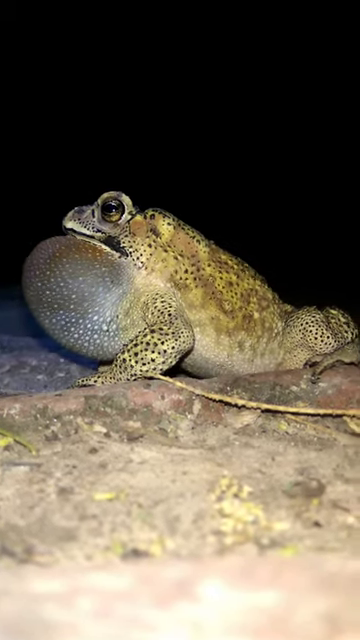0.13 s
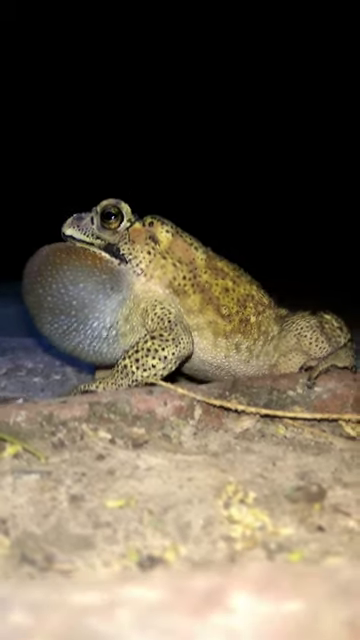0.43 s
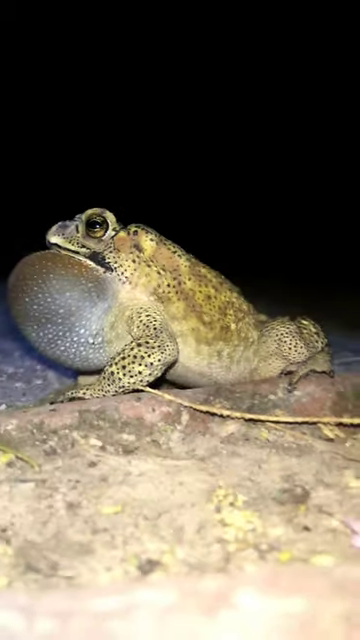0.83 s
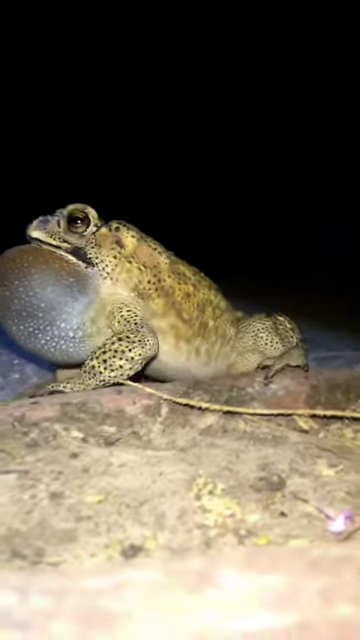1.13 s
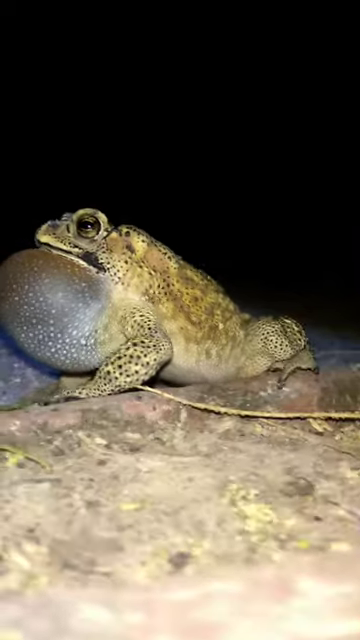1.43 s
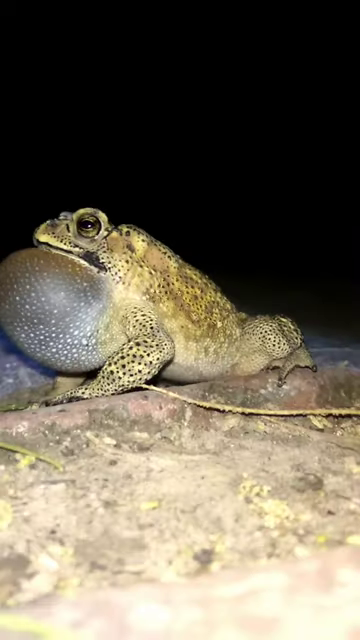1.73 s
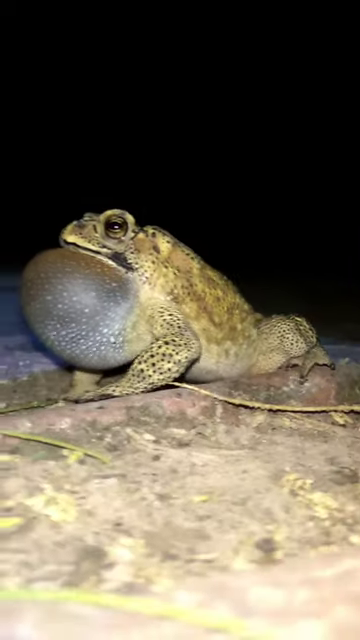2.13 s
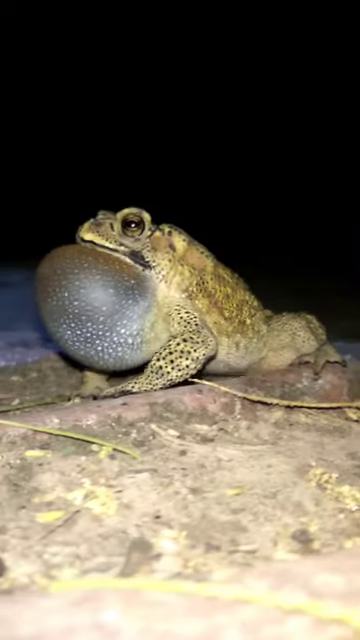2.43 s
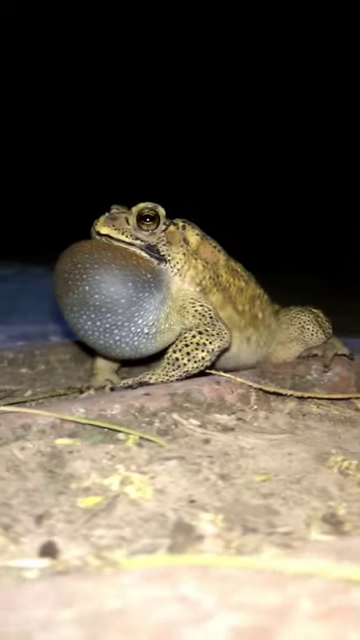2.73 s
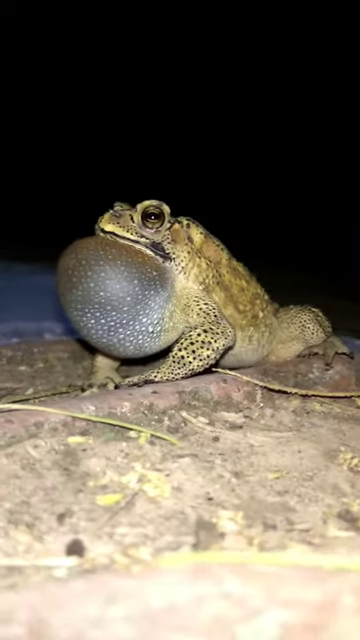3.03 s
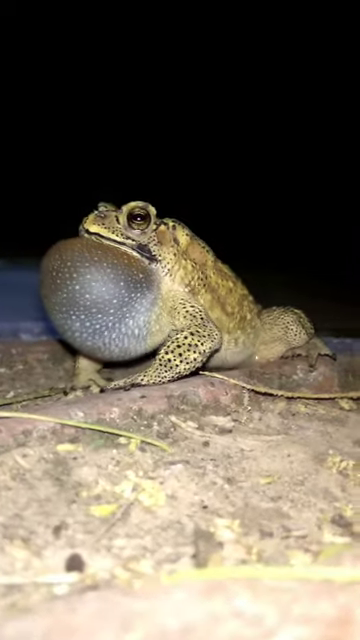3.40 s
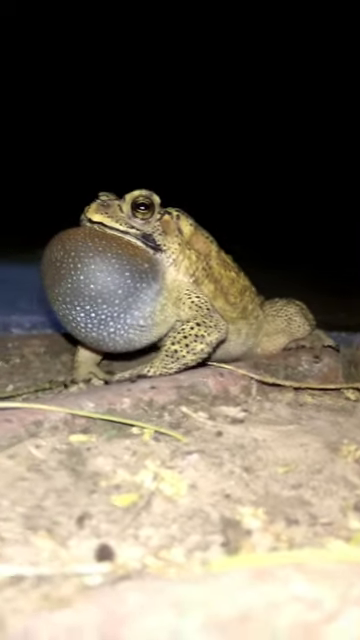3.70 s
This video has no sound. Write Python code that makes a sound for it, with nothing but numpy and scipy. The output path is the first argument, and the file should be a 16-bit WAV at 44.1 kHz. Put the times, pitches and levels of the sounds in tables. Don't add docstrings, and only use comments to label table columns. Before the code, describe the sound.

A toad close by trills steadily, loud pulsed tonal notes repeating about nine times a second at night.

```python
import sys
import numpy as np
from scipy import signal
from scipy.fft import rfft, irfft
from scipy.io import wavfile
from scipy.ndimage import uniform_filter1d

SR = 44100
rng = np.random.default_rng(int(sys.argv[2]) if len(sys.argv) > 2 else 0)


def magnitude_from_level(level_db):
    exponent = np.asarray(level_db, float) / 20
    return 10 ** exponent


def int16_out(signal):
    q = np.round(np.clip(np.atleast_2d(signal).T, -1, 1) * 32767)
    wavfile.write(sys.argv[1], SR, q.astype(np.int16))


N = 170226


def band(x, hz, width_hz):
    edges_hz = [max(hz - width_hz / 2, 15), hz + width_hz / 2]
    y = signal.sosfilt(signal.butter(2, edges_hz, "band", fs=SR, output="sos"), x)
    return y / np.sqrt(np.mean(y ** 2))


def walk(rate_hz):
    k = int(SR / rate_hz)
    steps = np.repeat(rng.standard_normal(N // k + 1), k)
    return 1.44 * uniform_filter1d(uniform_filter1d(steps, k), k)[:N]


def ringing_envelope(ms, rise, until_ms):
    hold_ms, ring_t60_ms = 3, 24.5
    choke, choke_ms = 0.2, 1
    late = ms - hold_ms
    decay_ms = (late + np.sqrt(late ** 2 + 0.68)) / 2
    choked = choke * (1 + np.tanh((ms - until_ms) / choke_ms)) / 2
    return rise * magnitude_from_level(-60 * decay_ms / ring_t60_ms) * (1 - choked)


def held_envelope(ms, rise, left_ms):
    held_db, fall_ms, fall_shape = 0.19, 25, 1.57
    ripple, ripple_ms = 0.12, 5
    env = magnitude_from_level(held_db) * rise * np.sin(np.pi / 2 * np.minimum(left_ms / fall_ms, 1)) ** fall_shape
    return env * (1 - ripple * np.sin(np.pi * ms / ripple_ms) ** 2 * (left_ms > fall_ms / 2))


def pulse(ms, hz, length_ms, until_ms, chance, port):
    attack_ms, scatter_db = 0.64, 1.5
    chirp_hz, chirp_ms = 44, 1.94
    after_ms = np.maximum(ms, 0)
    rise = (1 - np.exp(-after_ms / attack_ms)) ** 2
    f = hz * (1 + 0.009 * chance[1]) + chirp_hz * ms / chirp_ms * np.exp(1 - after_ms / chirp_ms)
    octave = magnitude_from_level(-24.5)
    if length_ms:
        left_ms = np.maximum(length_ms + 4 - ms, 0)
        env = held_envelope(ms, rise, left_ms)
        sag_hz = 81 * np.exp(-left_ms / 15.1)
        drop_hz = 155 * np.exp(-left_ms / 2.56)
        f = f - sag_hz - drop_hz
        octave = octave + magnitude_from_level(-13.5) * np.exp(-((left_ms - 5) / 5.5) ** 2 / 2)
    else:
        env = ringing_envelope(ms, rise, until_ms)
    phase = 2 * np.pi * np.cumsum(f * (ms > 0)) / SR + 0.57 * chance[2]
    env = env * magnitude_from_level(scatter_db * chance[0])

    octave_db, octave_phase = port
    upper = magnitude_from_level(octave_db) * (-0.05 - np.cos(2 * phase + octave_phase))
    for k in range(4, 10):
        overtone_db = -24 - 4.5 * (k - 4) + 6.2 * chance[k]
        upper = upper + magnitude_from_level(overtone_db) * np.sin(k * phase + np.pi * chance[k + 6])
    third = magnitude_from_level(-33) * np.sin(3 * phase)
    return env * (np.sin(phase) + octave * upper + third), env


def toad(lag_s, chance, port):
    # start t/s, second pulse t/ms, third t/ms, held t/ms, end t/ms
    notes_early = [(-0.001, 10.2, 19.8, 19.8, 36.5), (0.1027, 21.0, 32.0, 32.0, 47.7),
                   (0.2182, 9.0, 18.2, 18.2, 37.1), (0.3216, 9.3, 18.1, 18.1, 36.2),
                   (0.426, 8.9, 18.7, 18.7, 37.1), (0.5213, 19.9, 30.4, 30.4, 48.4),
                   (0.6385, 8.9, 18.3, 18.3, 37.5), (0.7323, 8.4, 17.7, 25.9, 39.4),
                   (0.8348, 8.4, 20.4, 37.3, 50.3), (0.9492, 8.8, 18.2, 25.6, 39.0),
                   (1.05, 9.1, 22.5, 38.8, 51.8), (1.1646, 9.2, 21.3, 37.0, 49.9),
                   (1.2763, 8.9, 18.3, 38.2, 51.6), (1.3926, 8.9, 22.9, 34.7, 48.0),
                   (1.5051, 8.5, 20.5, 36.3, 50.9), (1.6153, 8.7, 22.0, 38.9, 52.7),
                   (1.7269, 8.7, 21.0, 38.2, 47.5), (1.8346, 8.6, 17.9, 35.5, 54.3)]
    notes_late = [(1.9459, 9.2, 25.7, 43.8, 56.9), (2.0645, 8.9, 23.7, 34.7, 51.9),
                  (2.1794, 8.9, 21.8, 37.8, 51.9), (2.2895, 8.7, 23.7, 40.2, 54.1),
                  (2.4014, 9.0, 24.1, 40.4, 55.8), (2.5167, 9.3, 21.9, 37.9, 54.0),
                  (2.6322, 19.8, 29.7, 39.2, 51.5), (2.7472, 8.9, 20.8, 37.5, 55.6),
                  (2.8655, 9.8, 20.2, 37.8, 51.1), (2.9922, 20.3, 30.9, 37.8, 50.2),
                  (3.1135, 21.0, 31.7, 38.0, 54.4), (3.2296, 9.9, 22.3, 40.6, 56.3),
                  (3.3444, 10.2, 24.3, 42.2, 53.9), (3.462, 8.9, 22.0, 38.6, 54.1),
                  (3.5763, 9.2, 19.5, 37.1, 51.2), (3.6873, 9.1, 23.3, 39.8, 57.1),
                  (3.8132, 10.5, 19.0, 19.0, 34.6)]
    # t/s, sac pitch f/Hz, level/dB
    effort = [(0, 1316, -1), (1.001, 1330, 0.26), (2.0, 1345, 1.26), (3.001, 1343, 1.31), (3.86, 1342, 2.2)]
    gap_ms, lead_ms, first_db = 9.6, 1.1, -1.5
    pad, n = 400, np.arange(2200)
    out, env = np.zeros(N + 8000), np.zeros(N + 8000)
    effort_s, effort_hz, effort_db = np.array(effort).T
    for row, (start, second, third, held, end) in enumerate(list(notes_early) + list(notes_late)):
        middle = list(np.arange(third, held - gap_ms / 2, gap_ms))
        times = [0, second] + middle + [held]
        hz = np.interp(start, effort_s, effort_hz)
        note_db = np.interp(start, effort_s, effort_db)
        for k, at in enumerate(times):
            onset = (start + lag_s + (at - lead_ms) / 1000) * SR
            i = int(np.floor(onset))
            ms = (n + i - onset) * 1000 / SR
            length_ms = (end - held + lead_ms) * (k == len(times) - 1)
            until_ms = (times + [99])[k + 1] - at
            tone, e = pulse(ms, hz, length_ms, until_ms, chance[row, k], port)
            gain = magnitude_from_level(note_db + first_db * (k == 0))
            out[pad + i + n] += gain * tone
            env[pad + i + n] += gain * e
    return out[pad:pad + N], env[pad:pad + N]


def air(env):
    rush_hz, rasp_hz, thump_hz = 804, 7000, 660
    rush = band(rng.standard_normal(N), rush_hz, 0.91 * rush_hz) * env
    push = np.maximum(np.gradient(env), 0)
    thump = band(push, thump_hz, 1.566 * thump_hz)
    rasp = band(rng.standard_normal(N), rasp_hz, 1.82 * rasp_hz) * env ** 1.52
    rasp = rasp * magnitude_from_level(3.26 * walk(300))
    return magnitude_from_level(-34.5) * rasp + magnitude_from_level(-29) * rush + magnitude_from_level(-43) * thump


def echoes(call):
    level_db, t60_s, start_s = -47.5, 0.32, 0.0056
    t = np.arange(SR // 2) / SR
    tail = rng.standard_normal(len(t)) * magnitude_from_level(-60 * t / t60_s) * (t > start_s)
    tail = tail / np.sqrt(np.sum(tail ** 2))
    return magnitude_from_level(level_db) * signal.fftconvolve(call, tail)[:N]


def night():
    # f/Hz, level/dB
    hush_spectrum = [(25, 0), (150, -6), (400, -16.5), (900, -21.5), (2200, -20), (3200, -33), (5000, -53),
                     (9000, -75)]
    chorus_db, chorus_hz, chorus_width_hz, flicker_db = -55, 1436, 330, 5
    throb = magnitude_from_level(flicker_db * (walk(60) + walk(8.55)))
    far = band(rng.standard_normal(N), chorus_hz, chorus_width_hz)
    far = far + magnitude_from_level(-17.5) * band(rng.standard_normal(N), 2 * chorus_hz - 100, 200)
    hz, db = np.array(hush_spectrum).T
    f = np.arange(N // 2 + 1) * SR / N + 1
    weight = magnitude_from_level(np.interp(np.log(f), np.log(hz), db))
    hush = irfft(rfft(rng.standard_normal(N)) * weight, N)
    return magnitude_from_level(chorus_db) * throb * far + magnitude_from_level(-56 + 2.0 * walk(22)) * hush / np.std(hush)


def knocks():
    # t/s, level/dB, f/Hz, left minus right level/dB
    taps = [
        (0.296, -47.5, 494, -13),
        (1.717, -50.5, 490, -9),
        (1.796, -43, 441, -28),
        (1.826, -50, 440, -12),
        (1.914, -42.5, 433, -21),
        (2.028, -44.5, 435, -29),
        (2.736, -75, 550, -8),
    ]
    mode_ms, tick_db = 1.2, -15
    out, ms = np.zeros((2, N)), np.arange(600) * 1000 / SR
    ticks = rng.standard_normal((len(taps), 600))
    for (s, db, hz, pan_db), tick in zip(taps, ticks):
        tap = ms / mode_ms * np.exp(1 - ms / mode_ms) * np.sin(2 * np.pi * hz * ms / 1000)
        tap = tap + magnitude_from_level(tick_db) * uniform_filter1d(tick, size=7) * np.exp(-abs(ms - 2) / 0.99)
        i = int(s * SR)
        out[:, i:i + 600] += magnitude_from_level(db + np.array([[pan_db], [0]]) + 15) * tap
    return out


def scene():
    # level/dB, phase/rad
    octave_at_ports = [(-6.5, .7), (0, -1.1)]
    lags_s, levels_db = (8 / 44100, 0), (0.5, 0)
    chance = rng.standard_normal((40, 10, 16))
    ports = []
    for lag_s, db, port in zip(lags_s, levels_db, octave_at_ports):
        call, env = toad(lag_s, chance, port)
        ports.append(magnitude_from_level(db) * (call + air(env)) + echoes(call) + night())
    return np.array(ports) + knocks()


def top_cut(x):
    return signal.sosfilt(signal.butter(12, 16830, fs=SR, output="sos"), x)


def record(dry):
    skew, ceiling, knee, top_hz = -0.0072, 0.57, 26.5, 15800
    x = dry + skew * dry ** 2
    x = x / (1 + np.abs(x / ceiling) ** knee) ** (1 / knee)
    x = signal.sosfilt(signal.butter(6, top_hz, fs=SR, output="sos"), x)
    return top_cut(x)


dry = scene()
out = record(dry)
int16_out(out)
```